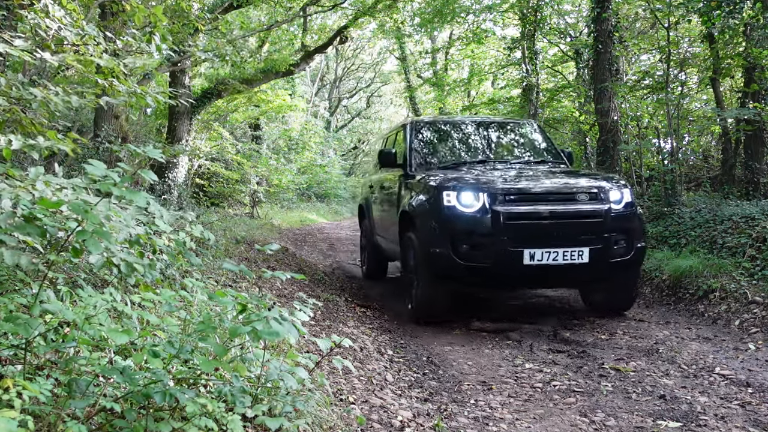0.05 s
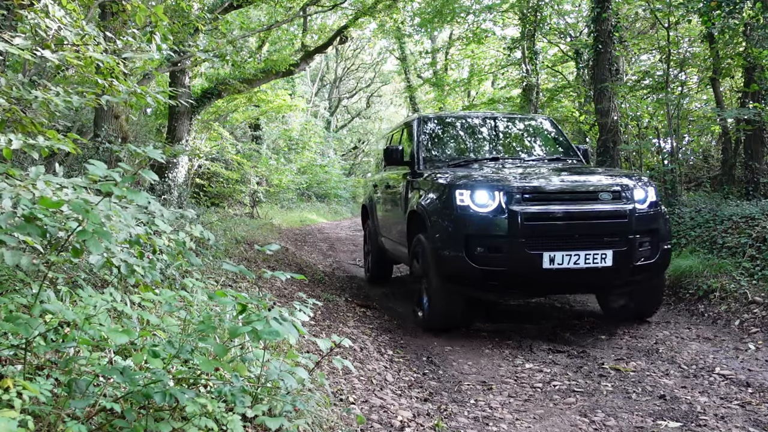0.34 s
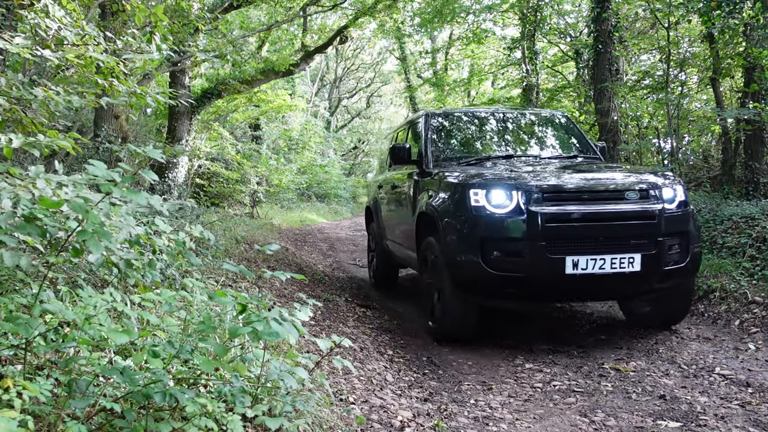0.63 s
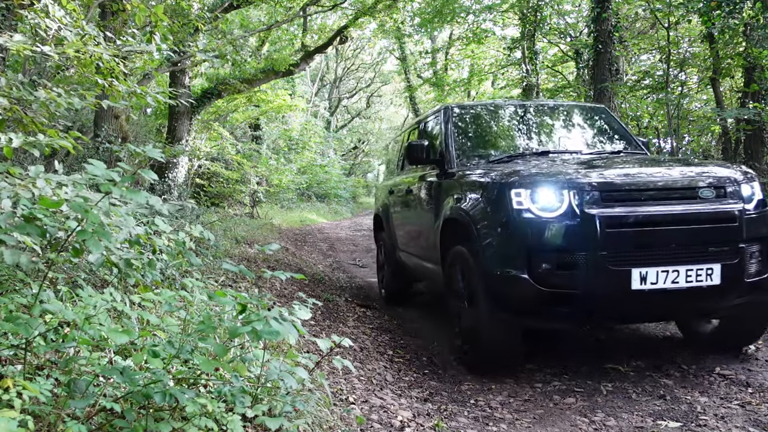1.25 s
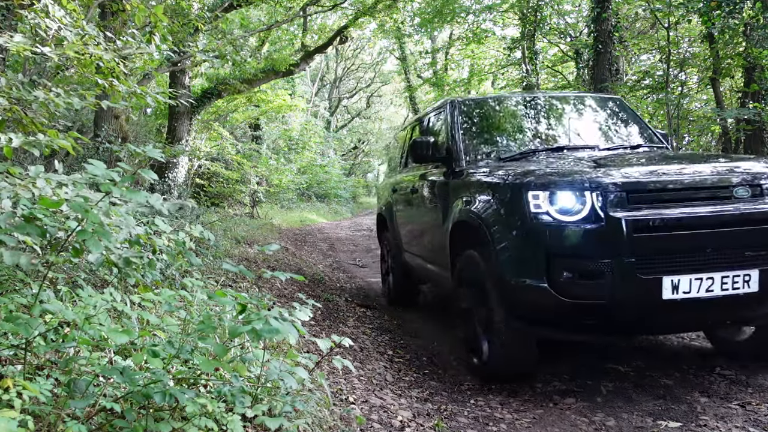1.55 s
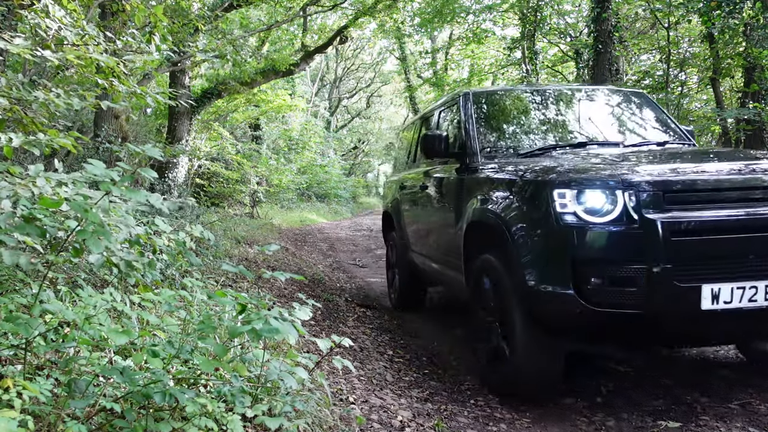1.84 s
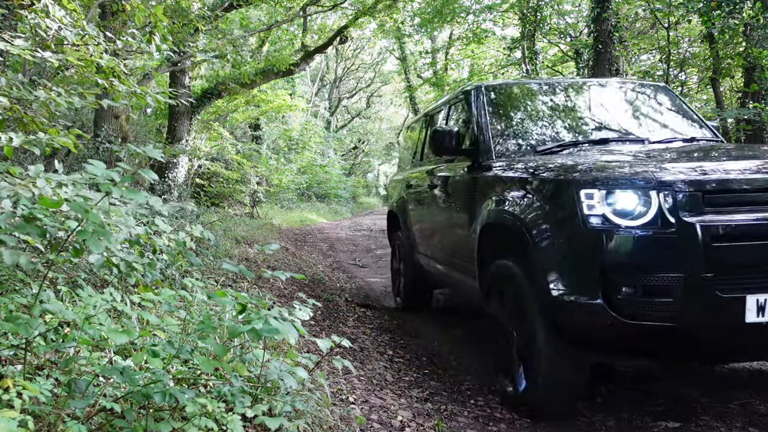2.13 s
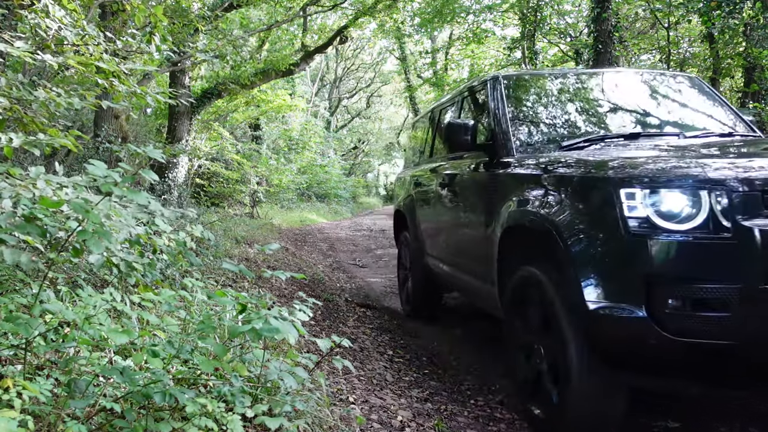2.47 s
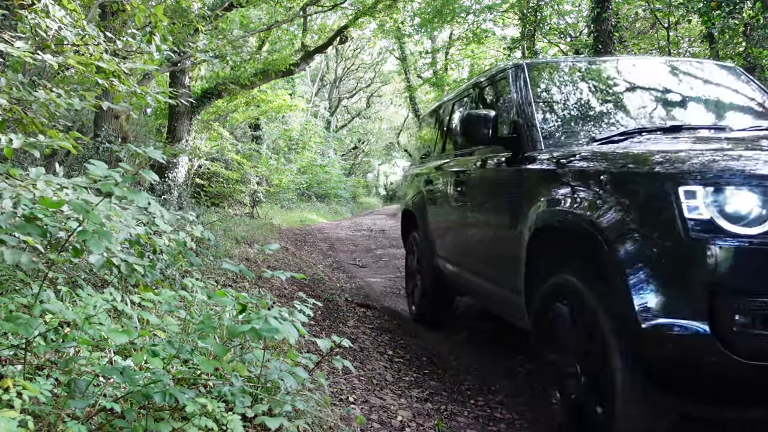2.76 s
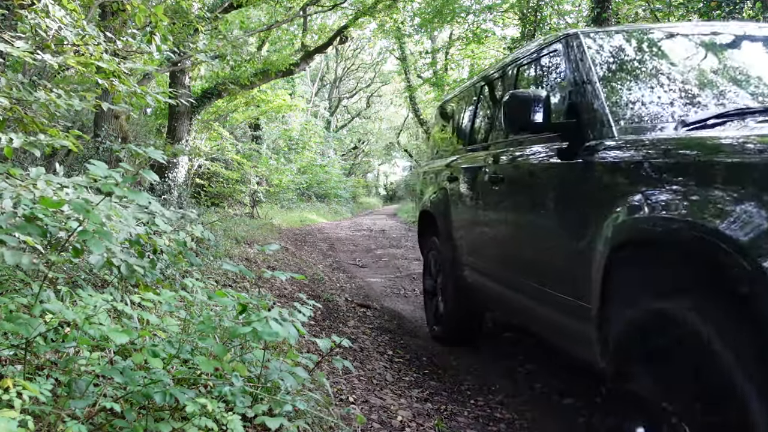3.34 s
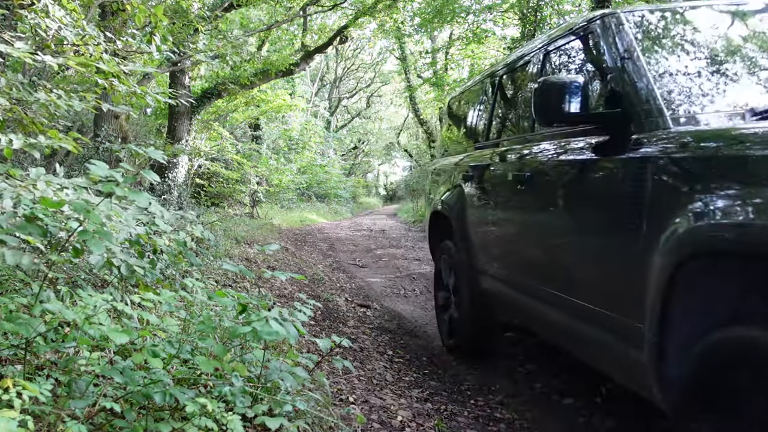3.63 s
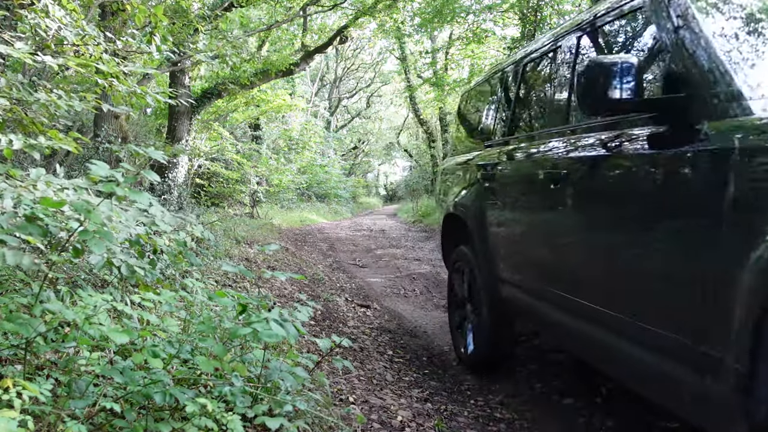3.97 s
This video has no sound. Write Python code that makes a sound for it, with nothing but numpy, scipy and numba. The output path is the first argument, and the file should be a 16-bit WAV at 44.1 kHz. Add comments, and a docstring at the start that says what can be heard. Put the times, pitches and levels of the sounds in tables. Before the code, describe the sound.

Car tyres crunching slowly over stones, dry leaves and twigs, with a faint engine hum.

```python
"""A car on a woodland track

A heavy car creeps up a leafy track. Its tyres crush stones, grit and dry leaves in dense showers
of tiny cracks, each a damped vibration; twigs and stones snap, and one stone knocks hollowly.
The engine hums low underneath at multiples of its crankshaft speed, and the trees scatter the sound."""
import sys
import numpy as np
from scipy import signal
from scipy.fft import rfft, irfft
from scipy.io import wavfile
from scipy.ndimage import uniform_filter1d
from numba import njit

SR = 44100
rng = np.random.default_rng(int(sys.argv[2]) if len(sys.argv) > 2 else 0)


def dump(signal):
    """Clip the signal to [-1, 1] and save it as 16-bit WAV at the path in sys.argv[1]."""
    limited = np.clip(np.atleast_2d(signal).T, -1, 1)
    pcm = np.round(limited * 32767).astype(np.int16)
    wavfile.write(sys.argv[1], SR, pcm)


N = 176400
TOP_HZ = 15300
# Crackle of the dry leaves. Each row: time in seconds, relative level in dB.
LEAF_LEVEL = [(0, -61.5), (.13, -60), (.34, -65), (1.04, -63.5), (1.47, -57.5), (1.86, -62.5), (2.33, -56),
              (2.45, -62), (2.55, -60), (2.67, -64), (2.83, -57.5), (2.95, -58.5), (3.5, -61), (4, -58.5)]


def undb(db):
    """Amplitude grows tenfold with every 20 dB."""
    return 10 ** (np.asarray(db) / 20)


def unit(x):
    """Normalisation to an rms of 1."""
    return x / np.sqrt(np.mean(x ** 2))


def curve(rows):
    """Linear interpolation of (seconds, value) rows at every sample."""
    return np.interp(np.arange(N) / SR, *np.array(rows, float).T)


def by_hz(rows, size):
    """Interpolation of (Hz, value) rows over log frequency, at the bins of a transform."""
    hz, value = np.array(rows, float).T
    return np.interp(np.log(np.fft.rfftfreq(size, 1 / SR) + 1), np.log(hz), value)


def colour(x, rows):
    """Minimum-phase filtering through (Hz, dB) points: folding the cepstrum makes it causal."""
    size = 2 * x.shape[-1]
    cepstrum = irfft(np.log(undb(by_hz(rows, size))))
    cepstrum[1:size // 2] *= 2
    cepstrum[size // 2 + 1:] = 0
    return irfft(rfft(x, size) * np.exp(rfft(cepstrum)))[..., :size // 2]


def fade(t, t60):
    """Exponential decay, by 60 dB in t60 seconds."""
    return np.exp(-np.log(1000) * t / t60)


def walk(per_s):
    """Slow random modulation: smoothed steps with an rms of 1."""
    hold = max(int(SR / per_s), 1)
    steps = rng.standard_normal(N)[np.arange(N) // hold]
    return unit(uniform_filter1d(uniform_filter1d(steps, hold), hold))


def add(out, start_s, sound):
    """Superposition of a sound from its start time on."""
    i = int(start_s * SR)
    out[i:i + len(sound)] += sound[:N - i]


@njit
def ring(starts, hz, cycles, sizes):
    """Damped oscillators: each grain is a sine that falls 60 dB over its number of cycles."""
    out = np.zeros(N)
    for k in range(len(starts)):
        length = cycles[k] * SR / hz[k]
        pole = np.exp(2j * np.pi * hz[k] / SR - np.log(1000) / length)
        phasor = sizes[k] + 0j
        for i in range(int(starts[k]), min(int(starts[k] + length), N)):
            phasor *= pole
            out[i] += phasor.imag
    return out


def shower(per_s, lo_hz, hi_hz, spectrum, cycles, spread_db, clump_db, clumps_per_s):
    """Shot noise: grains break at random times, mostly small, louder in clumps as the tread bites."""
    when, pitch, length, size = rng.random((int(per_s * N / SR), 4)).T
    hz = lo_hz + (hi_hz - lo_hz) * pitch
    size_db = -spread_db * np.log(np.maximum(size, 1 / 200))
    sizes = undb(size_db) * np.sqrt(hz)  # offsets the energy that high grains lose by being brief
    grains = ring(when * N, hz, cycles * (.5 + length), sizes)
    return unit(colour(grains, spectrum) * undb(clump_db * walk(clumps_per_s)))


def scattered(crack, tail_db=-11, tail_t60_s=0.058):
    """Early reflections: a crack, scaled to a peak of 1, gains a short diffuse tail."""
    t = np.arange(len(crack)) / SR
    tail = signal.fftconvolve(crack, rng.standard_normal(len(t)) * fade(t, tail_t60_s))[:len(t)]
    return crack / np.abs(crack).max() + undb(tail_db) * tail / np.abs(tail).max()


def woodland(car, t60_s=0.62):
    """Diffuse reverberation: trunks and foliage scatter a little sound back to each channel."""
    # Each row: frequency in Hz, gain of the scatter in dB.
    scatter_gain = [(50, -4), (130, -19), (300, -20.5), (1000, -13), (4000, -11), (9000, -17.5),
                    (14000, -8.5)]
    t = np.arange(SR // 2) / SR
    response = unit(rng.standard_normal((2, len(t))) * fade(t, t60_s)) / np.sqrt(len(t))
    return signal.fftconvolve(colour(car, scatter_gain)[None], response, axes=1)[:, :N]


def engine(waver_db=2.5):
    """Harmonics of the crankshaft speed: six cylinders fire three times a turn, so the third leads."""
    # Each row: time in seconds, crankshaft speed in turns per second.
    crank_speed = [(0, 34.2), (1.0, 34.28), (2.2, 34.13), (2.7, 35.74), (3.1, 36.2), (3.45, 35.1),
                   (4, 32.3)]
    # Each row: multiple of the crankshaft speed, relative level in dB.
    orders = [(2, -20), (3, 1), (4, -5), (5, -16), (7, -16), (8, -13)]
    # Each row: time in seconds, level of the hum in dB.
    level = [(0, -71), (.8, -75), (1.4, -71), (1.95, -73), (2.7, -66.5), (3.2, -63), (3.6, -67), (4, -76)]
    turns = np.cumsum(curve(crank_speed) * (1 + 0.0043 * walk(13.3))) / SR
    hum = sum(undb(db + waver_db * walk(7.03)) * np.sin(2 * np.pi * (order * turns + rng.random()))
              for order, db in orders)
    return unit(hum) * undb(curve(level))


def rumble():
    """Rolling noise: the tyres give a low random vibration of wavering strength."""
    # Each row: time in seconds, level in dB.
    level = [(0, -67), (.9, -70), (1.5, -66), (2.0, -69), (2.6, -64.5), (3.2, -61), (3.6, -66), (4, -60)]
    # Each row: frequency in Hz, relative spectral density in dB.
    spectrum = [(20, -37), (45, -14), (65, -4.5), (95, -1.5), (190, 1.5), (320, -6.5), (500, -2.5),
                (900, -19), (2000, -42)]
    return unit(colour(rng.standard_normal(N), spectrum)) * undb(curve(level) + 1.1 * walk(18))


def rut_bumps(rise_s=0.014, t60_s=0.078):
    """Soft impacts: each drop of a tyre into a rut excites one low damped mode."""
    # Each row: start in seconds, peak level in dB, frequency in Hz.
    bumps = [(1.83, -55.5, 91), (2.63, -53, 110)]
    out, t = np.zeros(N), np.arange(SR // 4) / SR
    envelope = np.minimum(t / rise_s, 1) * fade(np.maximum(t - rise_s, 0), t60_s)
    for start, db, hz in bumps:
        add(out, start, undb(db) * np.sin(2 * np.pi * hz * t) * envelope)
    return out


def stone_knock(start_s=3.2522, rise_s=0.0039):
    """Modal ringing: a stone knocks hollowly against the tyre."""
    # Each row: frequency in Hz, level in dB, 60 dB decay time in seconds.
    modes = [(189, -47.5, 0.11), (261, -46.5, 0.08), (736, -26, 0.039), (800, -26, 0.024)]
    out, t = np.zeros(N), np.arange(SR // 4) / SR
    knock = sum(undb(db) * np.sin(2 * np.pi * hz * t) * fade(t, t60) for hz, db, t60 in modes)
    add(out, start_s, knock * np.sin(np.pi / 2 * np.minimum(t / rise_s, 1)) ** 2)
    return out


def stalk_ticks():
    """Heavy damping: brittle stalks give sparse, dry clicks that follow the level of the leaves."""
    # Each row: frequency in Hz, relative gain in dB.
    spectrum = [(600, -21), (1700, -5), (4000, -2), (8000, -1), (16000, -30)]
    clicks = shower(90, 990, 10000, spectrum, cycles=2.9, spread_db=0.5, clump_db=3, clumps_per_s=10)
    return clicks * undb(curve(LEAF_LEVEL) - 10.5)


def twig_breaks(t60_s=0.0072, edge_ratio=1.33, muffle_hz=9500):
    """Brittle fracture: each twig splinters in a burst of band noise; leaf litter absorbs the top."""
    # Each row: start in seconds, level in dB, centre frequency in Hz.
    breaks = [(.116, -38, 8500), (0.1893, -36, 2900), (0.197, -35.5, 2130), (.214, -39, 2700),
              (0.538, -36.5, 3100), (0.6163, -42, 6800), (.676, -39.5, 2600), (1.537, -37, 3080),
              (1.803, -32, 3200), (1.826, -34, 3180), (1.991, -36.5, 4000), (2.099, -29.5, 4100),
              (2.283, -35, 5830), (2.302, -35, 6000), (2.304, -33, 6440), (2.3105, -35.5, 5200),
              (2.346, -35.5, 7450), (2.426, -34, 3900), (2.550, -35.5, 5400), (2.798, -35, 7500),
              (2.841, -38, 5700), (2.887, -33, 2980)]
    out, t = np.zeros(N), np.arange(SR // 10) / SR
    for start, db, hz in breaks:
        edges_hz = [hz / edge_ratio, min(hz * edge_ratio, TOP_HZ)]
        band = signal.butter(2, edges_hz, "band", fs=SR, output="sos")
        burst = signal.sosfilt(band, rng.standard_normal(len(t)) * fade(t, t60_s))
        add(out, start, undb(db) * scattered(burst))
    return signal.sosfilt(signal.butter(2, muffle_hz, fs=SR, output="sos"), out)


def stone_snaps(splinter_gain=0.71, crack_t60_s=0.0016):
    """Impulse excitation: stones pop from under the tread with a sharp crack and a brief ring."""
    # Each row: start in seconds, relative level in dB, pitch in Hz,
    # level of the crack against the ring in dB, bass cutoff in Hz.
    snaps = [(.489, -32, 1400, -2, 650), (0.6738, -31.5, 830, -4, 565), (1.157, -34, 1170, -4, 604),
             (1.336, -36.5, 1030, -14, 500), (1.702, -30.5, 1550, -2, 497), (2.086, -21, 1090, 0, 940),
             (2.202, -31, 1500, -18, 800), (2.380, -30, 1380, -2, 396), (2.568, -33.5, 1280, -8, 700),
             (2.752, -31.5, 1260, -11, 400), (3.081, -32, 1100, 5, 600), (3.100, -30, 1030, 4, 600),
             (3.125, -24.5, 1180, 6, 446), (3.137, -37.5, 900, -12, 500), (3.233, -31.5, 770, -9, 600),
             (3.497, -32, 1090, -20, 600), (3.657, -19.5, 1094, -4, 540), (3.902, -34.5, 890, -17, 295),
             (3.940, -30, 1290, -14, 700)]
    # Each row: multiple of the pitch, relative level in dB, 60 dB decay time in seconds.
    modes = [(.55, 2, 0.009), (.85, -21, 0.0089), (1.05, 17, 0.0097), (1.72, 14.5, 0.0051),
             (2.3, -7, 0.0027)]
    # Each row: frequency in Hz, relative gain in dB.
    crack_spectrum = [(300, -25), (1300, 0), (2500, 1.5), (4500, -2.5), (7000, -13), (12000, -18.5),
                      (15000, -45.5)]
    out, t = np.zeros(N), np.arange(SR // 10) / SR
    for start, db, hz, cutoff_hz, crack_db in ((s, d, h, c, k) for s, d, h, k, c in snaps):
        body = sum(undb(mode_db) * np.sin(2 * np.pi * hz * ratio * t) * fade(t, t60)
                   for ratio, mode_db, t60 in modes)
        splinters = splinter_gain * rng.standard_normal(len(t)) * fade(t, crack_t60_s)
        crack = colour((t == 0) + splinters, crack_spectrum)
        snap = body / np.abs(body).max() + undb(crack_db) * crack / np.abs(crack).max()
        bass_cut = signal.butter(3, cutoff_hz, "high", fs=SR, output="sos")  # small stones lack bass
        add(out, start, undb(db - 1) * scattered(signal.sosfilt(bass_cut, snap)))
    return out


def tyre_crunch():
    """Crackling noise: stones, grit, leaves and twigs break under the tyres, each in its own band."""
    # Each row: time in seconds, relative level in dB.
    stone_level = [(0.0, -57.5), (0.36, -70), (0.5, -56.5), (1.0, -62.5), (1.32, -53), (1.55, -57.5),
                   (1.85, -59.5), (2.1, -57.5), (2.52, -56), (2.57, -53), (2.69, -55), (3.05, -57),
                   (3.11, -51.5), (3.37, -54.5), (3.51, -52), (3.73, -55.5), (3.9, -51), (4.0, -53.5)]
    grit_level = [(0.0, -51), (0.2, -53.5), (0.29, -56), (0.54, -53.5), (1.04, -57), (1.24, -50.5),
                  (1.72, -51.5), (1.86, -54.5), (2.04, -51), (2.27, -55.5), (2.37, -48), (2.45, -53.5),
                  (2.57, -50), (2.79, -56), (2.84, -46.5), (2.97, -55.5), (3.11, -49), (3.45, -53.5),
                  (3.75, -50), (4.0, -51)]
    twig_level = [(1.05, -61), (1.25, -56), (1.55, -51), (1.85, -56), (2.6, -55), (3.3, -61)]
    # Each row: frequency in Hz, relative gain in dB.
    stone_tone = [(150, -34), (380, -20), (470, -8.5), (600, -7), (790, 1), (1000, 1.5), (1300, -2),
                  (1700, -6.5), (3000, -37.5)]
    grit_tone = [(700, -34.5), (1100, -3), (1450, 1.5), (1900, 0), (2550, -3), (3300, -6), (4400, -5.5),
                 (5400, -5.5), (7000, -12), (12000, -50)]
    leaf_tone = [(2500, -34), (4500, -10), (5800, -2.5), (7500, 0.5), (9500, -3), (12000, -14.5),
                 (14000, -13.5), (16000, -50)]
    twig_tone = [(1400, -27.5), (1900, -5), (2500, -12.5), (3150, -2), (3600, -2.5), (4300, -7.5),
                 (6500, -21)]
    fizz_tone = [(6000, -34), (10000, 8), (12500, 10), (15500, -14)]
    stones = shower(1800, 302, 1962, stone_tone,
                    cycles=12.4, spread_db=2.5, clump_db=0.72, clumps_per_s=90)
    grit = shower(5000, 915, 6970, grit_tone, cycles=11, spread_db=2, clump_db=0.98, clumps_per_s=88)
    leaves = shower(6000, 3900, 14600, leaf_tone,
                    cycles=9.2, spread_db=2, clump_db=1.36, clumps_per_s=64)
    twigs = shower(4200, 1460, 4890, twig_tone, cycles=18.4, spread_db=2.1, clump_db=1, clumps_per_s=78)
    fizz = shower(4000, 8100, 16600, fizz_tone, cycles=21, spread_db=4.5, clump_db=-2, clumps_per_s=70)
    fizz_db = -84 + 4 * np.arange(N) / SR  # the finest fizz of the leaves grows as the car nears
    ground = (stones * undb(curve(stone_level))
              + grit * undb(curve(grit_level) - 1.22)
              + leaves * undb(curve(LEAF_LEVEL) - 2.5)
              + twigs * undb(curve(twig_level))
              + fizz * undb(fizz_db))
    return ground * undb(0.5 * walk(90))


def direct_sound(car):
    """Phase and level differences between the channels place the car to the right, the bass least."""
    # Each row: frequency in Hz, phase lead of the left channel in radians.
    phase_lead = [(0, 0), (690, -0.54), (1810, -0.33), (5770, 0.14), (15200, 0.2)]
    # Each row: time in seconds, left minus right level in dB at a weight of 1.
    bearing = [(0, -2), (1.6, -1), (2.3, -1.5), (2.8, -3.5), (3.3, -3), (4, -4)]
    # Each row: frequency in Hz, weight of the bearing.
    bearing_weight = [(200, 0.17), (500, 0.24), (1000, 1.2), (2000, 1.5), (4000, 0.89), (12000, 1.9)]
    sides = np.array([[1], [-1]])
    spectra = rfft(car, 2 * N) * np.exp(.5j * sides * by_hz(phase_lead, 2 * N))
    directional = irfft(spectra * by_hz(bearing_weight, 2 * N))[:, :N]
    return irfft(spectra)[:, :N] + directional * (undb(sides * curve(bearing) / 2) - 1)


def scene():
    """Superposition: the car's direct sound plus its scatter from the trees."""
    cracks = tyre_crunch() + stalk_ticks() + stone_snaps() + twig_breaks()
    car = cracks + stone_knock() + rut_bumps() + rumble() + engine()
    return direct_sound(car) + woodland(car)


def record(dry):
    """Band limiting: a steep low-pass filter cuts the highest treble."""
    return signal.sosfilt(signal.ellip(8, .2, 70, TOP_HZ, fs=SR, output="sos"), dry)


dry = scene()
out = record(dry)
dump(out)
```